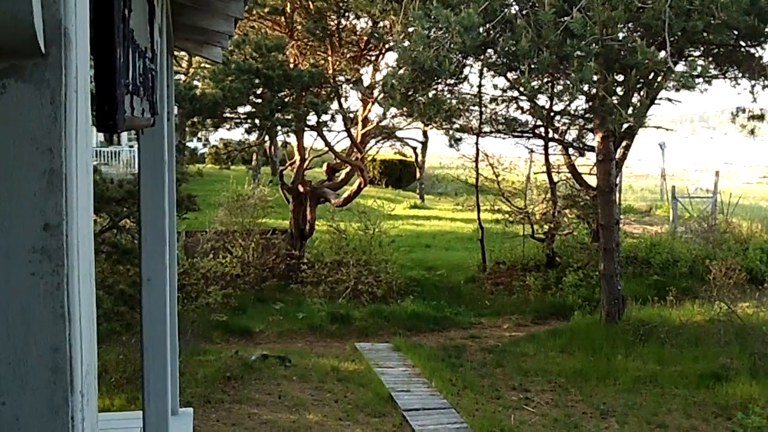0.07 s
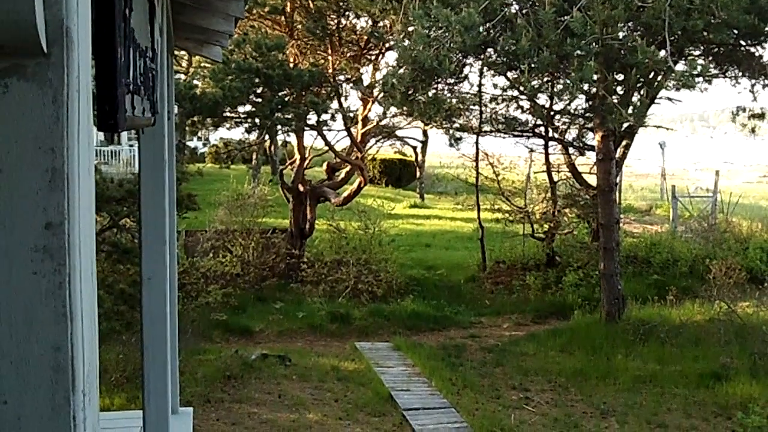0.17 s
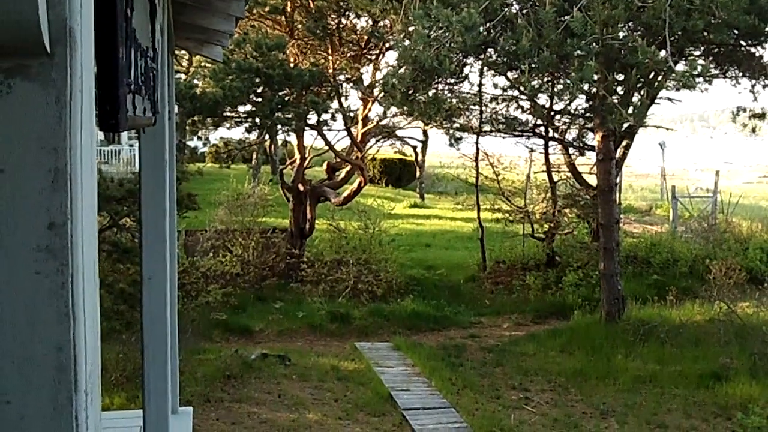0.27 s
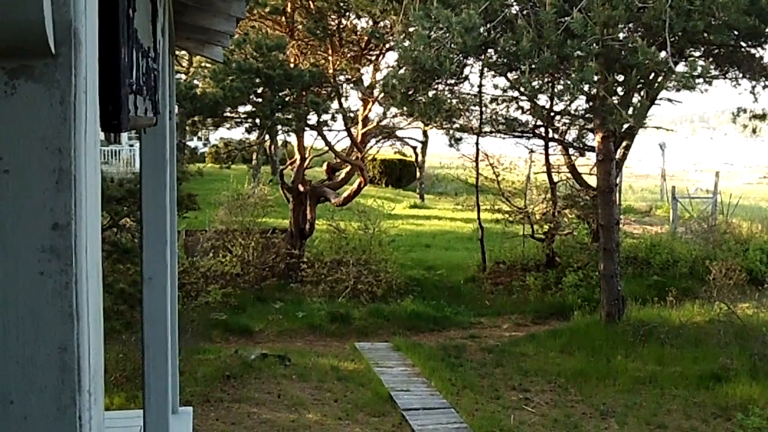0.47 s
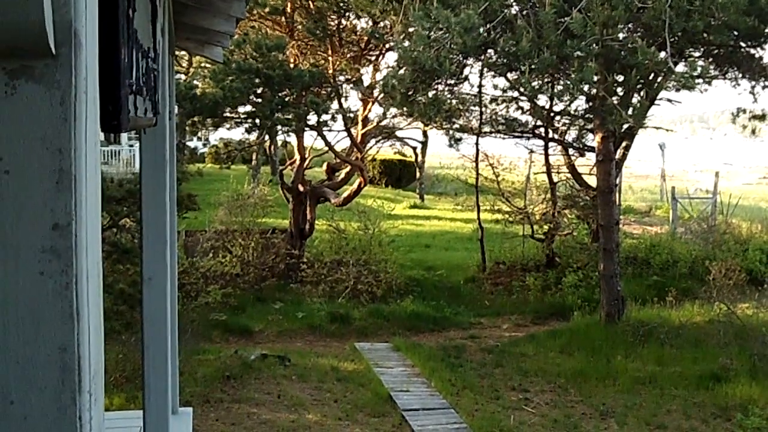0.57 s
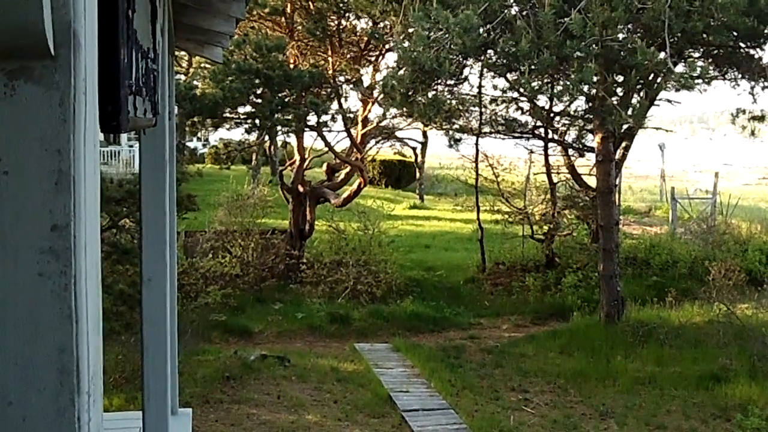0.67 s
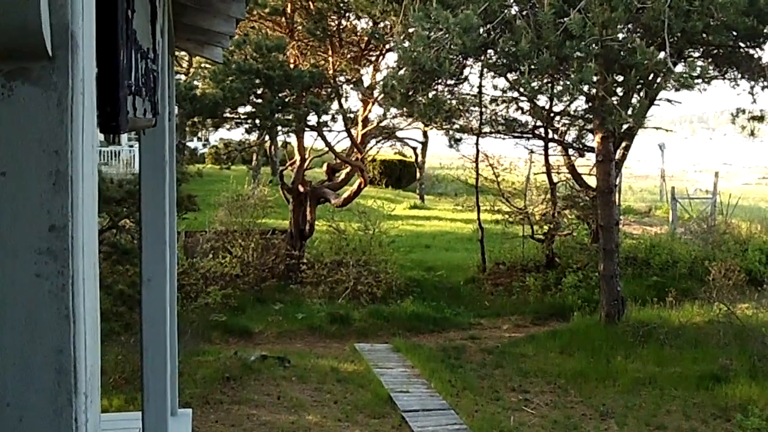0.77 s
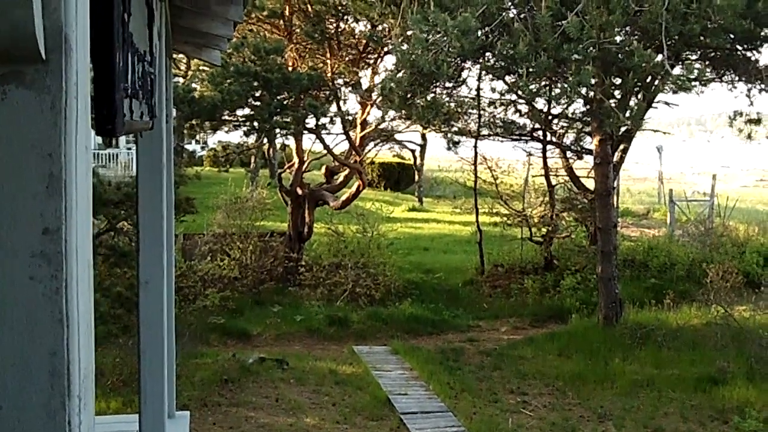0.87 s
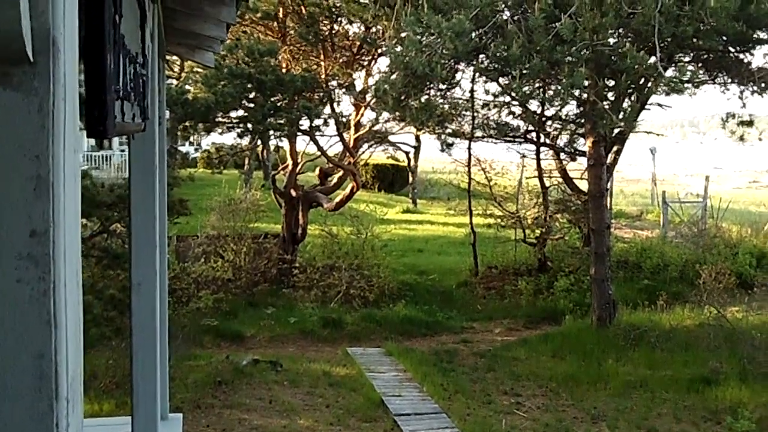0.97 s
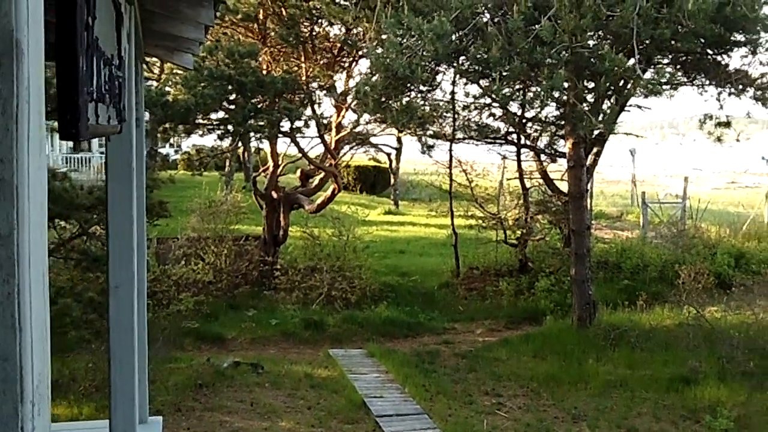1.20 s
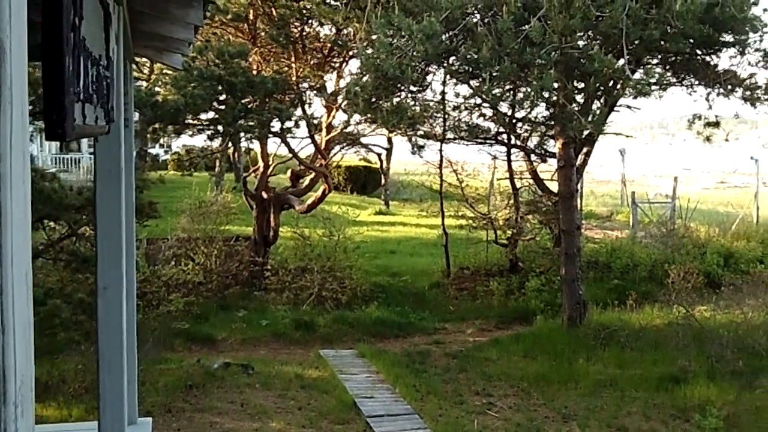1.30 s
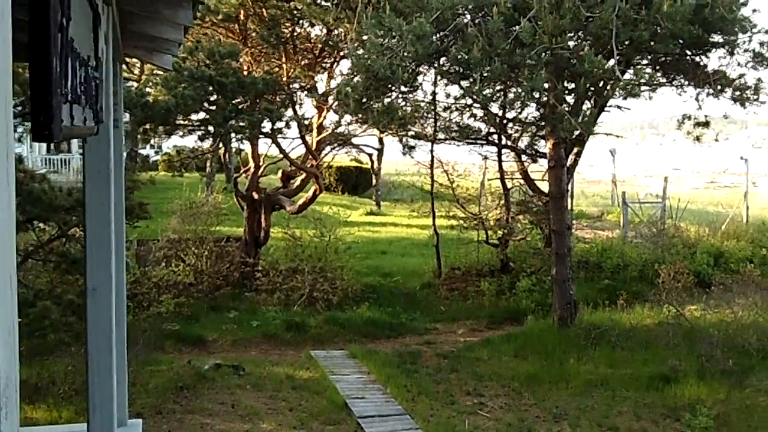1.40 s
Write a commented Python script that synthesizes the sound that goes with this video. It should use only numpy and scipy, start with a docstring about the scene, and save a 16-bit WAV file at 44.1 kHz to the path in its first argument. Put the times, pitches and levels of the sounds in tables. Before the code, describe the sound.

Microphone handling noise: a short rustle, then low bumps, with faint wind and surf behind.

```python
"""On a porch, over a quiet yard by the shore, with the microphone of a hand-held camera.
Distant surf and wind are there from the start, a soft, even wash. Almost at once a finger catches
on the camera, right at the microphone, and slides briefly, ringing the casing. The grip then shifts
in dull thumps, with a strong double one near a quarter second and another just after one second.
A faint rumble of the hand and the hiss of the microphone run underneath to the end."""
import sys
import numpy as np
from scipy import signal
from scipy.fft import rfft, irfft
from scipy.io import wavfile

SR = 44100
rng = np.random.default_rng(int(sys.argv[2]) if len(sys.argv) > 2 else 0)


def unload_wav(signal):
    """Save mono or channel-first audio to the path in sys.argv[1] as 16-bit WAV at rate SR, clipped to [-1, 1]."""
    wavfile.write(
        sys.argv[1],
        SR,
        np.round(np.clip(np.atleast_2d(signal).T, -1, 1) * 32767).astype(np.int16),
    )


N = 63945
TIME = np.arange(N) / SR

# Bumps of the grip: t/s, level/dB, contact/ms, damping ratio, further gain (+ press, - release)
GRIP_THUMPS = [(.148, -49.5, 3, 0.32, -1.15), (.196, -48, 3.5, 0.28, -1), (0.2286, -19.5, 1.58, 0.33, 1),
               (.2590, -19, 1.98, 2.2, 1), (0.29, -48, 2.7, 0.69, 1), (0.319, -46.5, 1.7, .6, 0.87),
               (0.341, -42, 2.8, 0.55, -1.08), (.390, -33.5, 4, 1, 0.26), (0.4098, -37, 3.75, 0.65, -1.28),
               (0.44, -45.5, 1.9, 0.92, 1), (.616, -44.5, 2.8, 1.2, 1), (.742, -55, 5.1, .6, 1),
               (.884, -44, 3.3, 1.1, 1), (0.8953, -35.5, 2.73, 0.46, -1.06),
               (0.9327, -34.5, 0.42, 1.1, -0.74), (1.003, -44.5, 2.4, .6, 1),
               (1.0613, -21, 1.3, 0.34, 0.92), (1.0902, -25.5, 1.91, 1.7, 1),
               (1.127, -45.5, 2.7, 0.88, -0.92), (1.171, -43.5, 2.5, 0.46, 0.93),
               (1.186, -40, 2.07, 0.36, -1), (1.2452, -39.5, 3.4, 0.65, -1),
               (1.385, -42.5, 1.53, 1.4, -1.14), (1.4254, -39, 1.66, .8, 0.93)]
# Resonances of the camera's casing: f/Hz, width/Hz, level/dB
CASING_MODES = [(318, 237, 3), (700, 170, 1), (898, 150, 3), (1730, 170, -1), (1925, 120, -5.5),
                (2130, 170, -13), (2730, 380, -17), (3400, 200, -30), (3830, 140, -17)]
# Course of the hand's rumble: t/s, level/dB
RUMBLE_LEVELS = [(0, -63), (.18, -61.5), (.28, -52), (.42, -59), (.5, -66), (.72, -64.5), (.82, -70),
                 (.9, -55), (1.03, -62), (1.15, -53.5), (1.32, -62.5), (1.45, -57)]
# Spectrum of the hand's rumble: f/Hz, relative level/dB
RUMBLE_SPECTRUM = [(20, -7), (55, 3), (100, -3.5), (170, -8.5), (300, -28.5), (600, -54)]
# Spectrum of the surf and wind as they reach the porch: f/Hz, relative level/dB
WASH_SPECTRUM = [(30, -3), (120, -5.5), (250, 0.5), (420, 0), (650, -0.5), (1000, -1.5), (1500, -2),
                 (2000, -9), (2450, -14.5), (3500, -14.5), (4500, -21.5), (6500, -28.5), (9000, -37)]

SWING_HZ = 68.5   # the camera body on the soft grip
CATCH_S = 0.0447   # the finger first touches


def grip_thumps():
    """The shifting grip presses and releases the camera body: dull thumps right at the microphone."""
    return sum(gain * push(at_s, db, contact_ms, damping)
               for at_s, db, contact_ms, damping, gain in GRIP_THUMPS)


def push(at_s, peak_db, contact_ms, damping):
    """A soft bell-shaped push; the body swings back once or twice, less under a firm grip."""
    force = np.exp(-0.5 * ((TIME - at_s) * 1000 / contact_ms) ** 2) + 1e-18
    omega = 2 * np.pi * SWING_HZ
    body = signal.bilinear([1, 0, 0], [1, 2 * damping * omega, omega ** 2], SR)
    swing = signal.lfilter(*body, force)
    return from_db(peak_db) * swing / np.abs(swing).max()


def finger_catch(tick_db=-35.5, tick_top_hz=800):
    """The finger lands on the camera: a dull tick in the casing and a small push."""
    impulse = 1e-18 + (np.arange(N) == int(CATCH_S * SR))
    tick = casing(cut(impulse, tick_top_hz, "low", order=1))
    nudge = push(CATCH_S, peak_db=-42.5, contact_ms=0.54, damping=0.45)
    return from_db(tick_db) * tick / np.abs(tick).max() + nudge


def finger_slide(slips_per_s=2200, attack_s=0.025, fade_from_s=0.051, stroke_t60_s=0.16, spurt_t60_s=0.025):
    """Dense tiny slips and friction ring the casing: a spurt at the catch, then a short stroke."""
    slips = (rng.random(N) < slips_per_s / SR) * rng.choice([-1, 1], N)
    slips = slips * from_db(2.5 * rng.standard_normal(N))   # uneven in strength
    friction = 0.24 * rng.standard_normal(N)
    ring = rms_one(casing(rms_one(slips) + friction))
    skin_hiss = from_db(-16.5) * rms_one(cut(rng.standard_normal(N), hz=6350, kind="low", order=8))
    age = TIME - CATCH_S
    spurt = (age > 0) * from_db(-45 - 60 * np.abs(age) / spurt_t60_s)
    attack = np.sqrt(np.clip(age / attack_s, 0, 1))
    stroke = attack * from_db(-47.5 - 60 * np.maximum(age - fade_from_s, 0) / stroke_t60_s)
    return (ring + skin_hiss) * (spurt + stroke)


def casing(x):
    """The hollow plastic body around the microphone: broad resonances, a gap and a steep top."""
    ring = sum(from_db(db) * resonance(x, hz, width_hz) for hz, width_hz, db in CASING_MODES)
    hollowed = ring - resonance(ring, hz=1280, width_hz=470)
    return cut(hollowed, hz=4250, kind="low", order=12)


def hand_rumble():
    """The holding hand rumbles faintly through the body, rising and falling."""
    level_db = np.interp(TIME, *np.transpose(RUMBLE_LEVELS))
    return from_db(level_db) * coloured_noise(RUMBLE_SPECTRUM, flicker_db=3.0)


def surf_and_wind(level_db=-57.5, start_db=-2, rise_s=0.39, swell_db=0.26):
    """Far off beyond the yard, an even wash that starts a little softer and barely swells."""
    soft_start_db = start_db * np.clip(1 - TIME / rise_s, 0, 1)
    envelope = from_db(level_db + soft_start_db - swell_db * drift(rate_hz=1.8))
    return envelope * coloured_noise(WASH_SPECTRUM, flicker_db=0.73)


def microphone_hiss(level_db=-70.5):
    """The microphone's own noise floor: flat electronic hiss in the treble."""
    return from_db(level_db) * rms_one(cut(rng.standard_normal(N), hz=2900, kind="high", order=1))


def coloured_noise(spectrum, flicker_db):
    """Noise of a given spectrum whose octaves flicker each on their own; rms 1."""
    hz = np.maximum(np.arange(N // 2 + 1) * SR / N, 1)
    points_hz, points_db = np.transpose(spectrum)
    shape_db = np.interp(np.log(hz), np.log(points_hz), points_db)
    bins = rfft(rng.standard_normal(N)) * from_db(shape_db)
    octave = np.clip(np.floor(np.log2(hz)), 6, 13)   # one band below 128 Hz, one above 8192 Hz
    bands = (irfft(bins * (octave == k), N) for k in np.unique(octave))
    return rms_one(sum(band * from_db(flicker_db * drift(rate_hz=8)) for band in bands))


def drift(rate_hz):
    """A smooth random wander of rms 1, mostly slower than `rate_hz`."""
    pole = np.exp(-2 * np.pi * rate_hz / SR)
    wander = signal.lfilter([1], [1, -2 * pole, pole ** 2], rng.standard_normal(N + SR))
    return rms_one(wander[SR:])


def resonance(x, hz, width_hz):
    """One resonance with gain 1 at its top."""
    radius = np.exp(-np.pi * width_hz / SR)
    feedback = [1, -2 * radius * np.cos(2 * np.pi * hz / SR), radius ** 2]
    return signal.lfilter(np.array([1, 0, -1]) * (1 - radius ** 2) / 2, feedback, x)


def cut(x, hz, kind, order):
    """Butterworth high- or low-pass."""
    return signal.sosfilt(signal.butter(order, hz, kind, fs=SR, output="sos"), x)


def from_db(db):
    """Decibels to gain."""
    return 10 ** (np.asarray(db) / 20)


def rms_one(x):
    """Scale to unit rms."""
    return x / np.sqrt(np.mean(x ** 2) + 1e-20)


def scene():
    """One microphone on the porch, mono: the wash far away, the handling right up close."""
    far = surf_and_wind()
    close = grip_thumps() + hand_rumble() + finger_catch() + finger_slide()
    return (far + close + microphone_hiss())[None]


def record(dry, notch_hz=7690, notch_width_hz=390, top_hz=15680):
    """The camera notches out one narrow treble band and cuts the top."""
    notched = signal.lfilter(*signal.iirnotch(notch_hz, notch_hz / notch_width_hz, fs=SR), dry)
    return signal.sosfilt(signal.ellip(16, 0.1, 60, top_hz, fs=SR, output="sos"), notched)


dry = scene()
out = record(dry)
unload_wav(out)
```